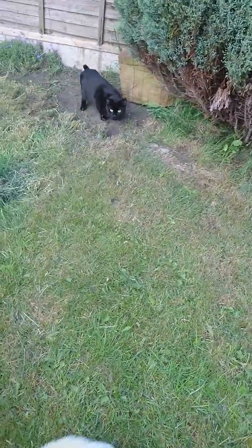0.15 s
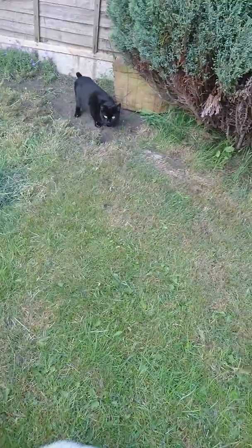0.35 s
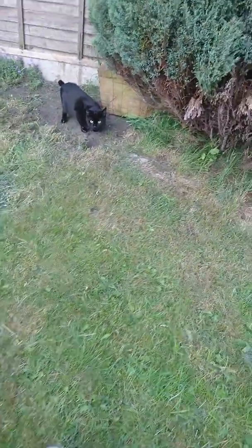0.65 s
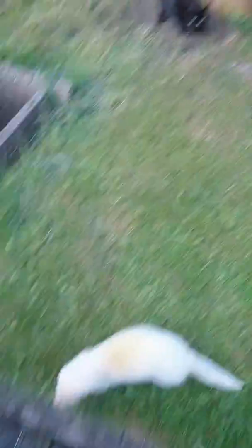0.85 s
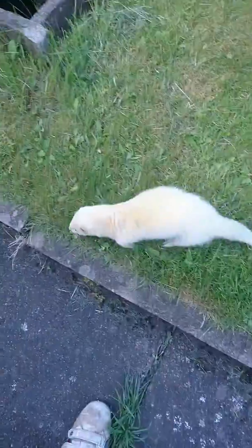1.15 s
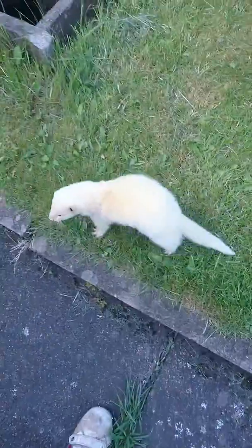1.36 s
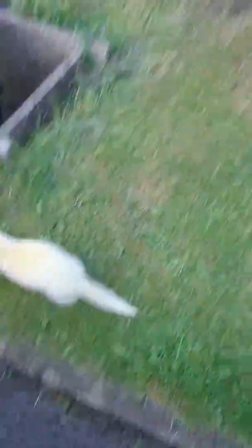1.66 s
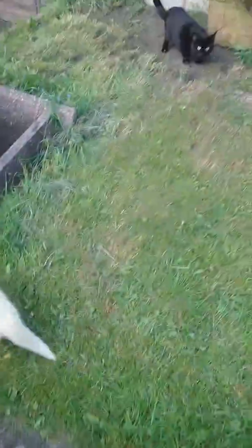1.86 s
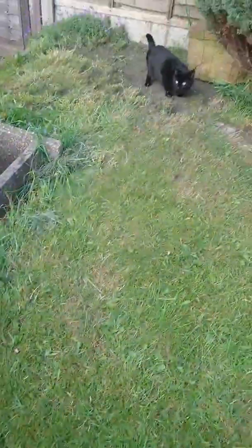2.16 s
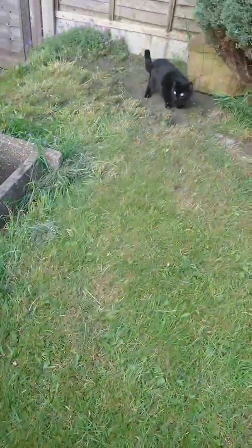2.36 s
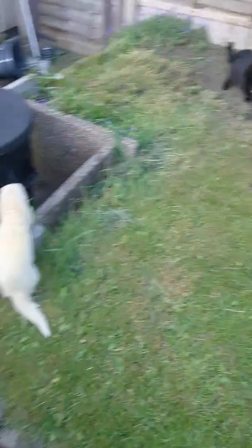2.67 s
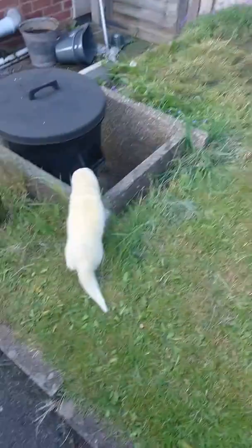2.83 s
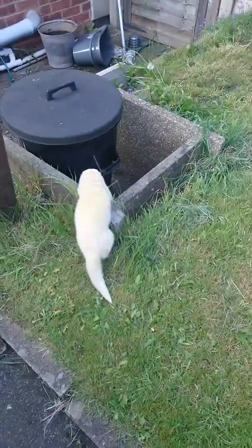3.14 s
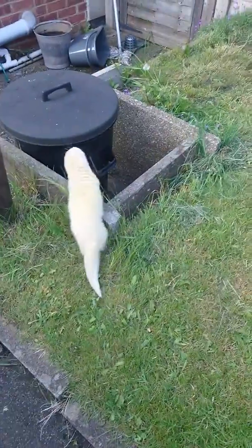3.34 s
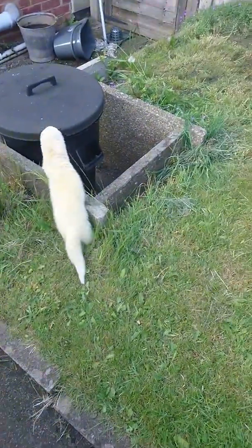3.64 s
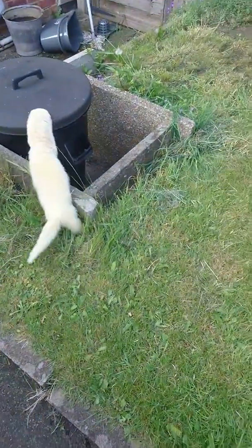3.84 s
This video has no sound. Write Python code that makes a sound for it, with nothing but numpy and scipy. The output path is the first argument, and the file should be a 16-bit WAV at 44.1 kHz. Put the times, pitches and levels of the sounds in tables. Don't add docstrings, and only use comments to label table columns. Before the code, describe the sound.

Ferret gives short soft clucks on a lawn after wind buffets the microphone, with distant bird

```python
import sys
import numpy as np
from scipy import signal
from scipy.fft import rfft, irfft
from scipy.io import wavfile
from scipy.ndimage import uniform_filter1d

SR = 44100
rng = np.random.default_rng(int(sys.argv[2]) if len(sys.argv) > 2 else 0)


def dump(signal):
    limited = np.clip(np.atleast_2d(signal).T, -1, 1)
    pcm = np.round(limited * 32767).astype(np.int16)
    wavfile.write(sys.argv[1], SR, pcm)


def attenuation_scalar(level_db):
    decades = np.asarray(level_db, float) / 20
    return 10 ** decades


N = 176400


def read(points, hz):
    f, value = np.transpose(points)
    return np.interp(np.log(hz + 1), np.log(f + 1), value)


def evened(x):
    return x / np.sqrt(np.mean(x ** 2) + 1e-20)


def add(mix, s, sound):
    part = mix[..., max(round(s * SR), 0):][..., :sound.shape[-1]]
    part += sound[..., :part.shape[-1]]


def drift(count, size):
    once = uniform_filter1d(rng.standard_normal(count), size)
    return evened(uniform_filter1d(once, size))


def bumps(rows, t):
    return sum(attenuation_scalar(db) * np.exp(-((t - s) / w) ** 2) for s, w, db in rows)


def echoes(x, t60, wet_db, first=500):
    t = np.arange(SR // 2) / SR
    sparse = rng.standard_normal((2, len(t))) * (rng.random((2, len(t))) < .3)
    taps = sparse * attenuation_scalar(-60 * t / t60) * (t * SR > first)
    taps /= np.linalg.norm(taps, axis=1, keepdims=True)
    return x + attenuation_scalar(wet_db) * signal.fftconvolve(x, taps, axes=1)[:, :N]


def noise_frames():
    a = rng.standard_normal((N // 256 + 5, 513, 4)).T
    hz = np.fft.rfftfreq(1024, 1 / SR)[:, None]
    t = np.arange(a.shape[2]) * 256 / SR
    return a[0] + 1j * a[1], a[2] + 1j * a[3], hz, t


# frequency in Hz, density in dB per Hz.
HUSH = [(29, -35), (50, -1), (151, -7.5), (394, -10), (913, -9.5), (2170, -22), (4450, -26), (10600, -31.5),
        (15500, -42)]
# time in seconds, level in dB.
HUSH_LEVEL = [(.65, 2.5), (1.0, 0.6), (1.8, 0.25), (2.15, 3), (3.6, -0.7), (3.9, 2.5)]
# frequency in Hz, likeness from 0 to 1.
SAME = [(290, 0.88), (640, 0.072), (1200, 0.095), (2500, 0.043)]
# frequency in Hz, left minus right in dB.
LEAN = [(60, -5), (380, -1.5), (1290, -3.5), (2380, -1), (4400, 5.5), (8000, -1.3)]
# middle in seconds, half width in seconds, level in dB,
# frequency in Hz, half width in octaves.
DRONE = (1.58, 0.61, 6.2, 283, 0.73)
HUSH_DB, PATCH_DB = -61.5, 1.16
TRAFFIC_DB_PER_S = -2
AIR_DB = 12


def hush():
    a, b, hz, t = noise_frames()
    patches = uniform_filter1d(rng.standard_normal(a.shape), 10, 0)
    patches = evened(uniform_filter1d(patches, 14, 1))
    same, lean = np.clip(read(SAME, hz), -1, 1), attenuation_scalar(read(LEAN, hz) / 2)
    z = np.array([a * lean, (same * a + np.sqrt(1 - same ** 2) * b) / lean])
    far = np.clip(1.3 - hz / 3000, 0, 1) * np.interp(t, *np.transpose(HUSH_LEVEL))
    traffic = TRAFFIC_DB_PER_S * (t - 2.5) * (hz < 600)
    air = AIR_DB * (hz > 12800) * np.minimum(np.tanh(4 * (t - .9)), .4)
    z *= attenuation_scalar(read(HUSH, hz) + PATCH_DB * patches + far + traffic + air)
    s, w, db, f, octaves = DRONE
    z[1] *= attenuation_scalar(db * np.exp(-((t - s) / w) ** 4 - (np.log2((hz + 1) / f) / octaves) ** 2))
    return attenuation_scalar(HUSH_DB) * evened(signal.istft(z, nperseg=1024, noverlap=768)[1][:, :N])


# time in seconds, level in dB.
LEFT_WIND = [(0, -33.5), (.3, -34), (.5, -32), (.7, -30.5), (.78, -41), (1.12, -62), (1.17, -53.5),
             (2.05, -46), (2.15, -67), (2.5, -52), (2.7, -65), (4, -69)]
RIGHT_WIND = [(0, -42.5), (.25, -47), (.3, -73), (.55, -55), (.66, -69), (.9, -33.5), (1.02, -36.5),
              (1.06, -66), (1.97, -59), (2.03, -46.5), (2.08, -72.5), (4, -73.5)]
# middle in seconds, level in dB.
GUSTS = [(0.826, -33.5), (1.0, -38), (1.083, -42), (1.229, -39.5), (1.46, -50.5), (1.651, -45),
         (1.707, -44), (1.919, -46.5), (1.97, -52), (2.36, -50.5), (2.519, -55), (2.86, -58), (3.398, -54)]
# middle in seconds, peak in dB,
# push (+1) or pull (-1), half width in ms.
SLAPS = [(0.0352, -34, 1, 0.61), (0.0531, -26.5, -1, 1.1), (0.1048, -27, 1, 0.88), (0.1558, -32, -1, 1.8),
         (0.2185, -24.5, 1, 1.23), (0.2506, -20, -1, 1.36), (0.3022, -23, 1, 1.8), (0.3396, -22, -1, 1.5),
         (0.3735, -21.5, -1, 0.64), (0.3758, -16, 1, 2), (0.398, -21, 1, 1.6), (0.403, -22.5, -1, 1.9),
         (0.4074, -24, 1, 1.7), (0.4368, -22.5, 1, 1.1), (0.4443, -17, -1, 1.3), (0.4771, -15.5, 1, 1.06),
         (0.491, -13, 1, 1.5), (0.54, -27, -1, 4), (0.5681, -21, 1, 1.6), (0.5709, -18.5, -1, 1),
         (0.5842, -18, -1, 0.83), (0.6228, -25.5, -1, 0.65), (0.6442, -20.5, -1, 1.05),
         (0.673, -22, 1, 1.5), (0.683, -26, 1, 1.7), (0.693, -23.5, -1, 1.26), (0.6974, -22.5, 1, 0.81),
         (0.724, -25.5, 1, 0.92), (0.832, -18.5, -1, 1.6), (0.998, -29, 1, 2.5)]
EDDY_HZ = (149.3, 118)
EDDY_HZ_PER_DB, EDDY_SLOPE_DB = 8.5, -35
GUST_S, LUMPY_DB = 0.036, 3.5


def wind():
    a, b, hz, t = noise_frames()
    gusts = bumps([(s, GUST_S, db) for s, db in GUSTS], t)
    left_db = 20 * np.log10(attenuation_scalar(np.interp(t, *np.transpose(LEFT_WIND))) + gusts)
    right_db = np.interp(t, *np.transpose(RIGHT_WIND))
    out = np.zeros((2, N))
    for k, (z, db) in enumerate([(a, left_db), (b, right_db)]):
        corner = np.maximum(EDDY_HZ[k] + EDDY_HZ_PER_DB * (uniform_filter1d(db, 30) + 36), 85)
        shape = attenuation_scalar(EDDY_SLOPE_DB * np.log2(1 + (hz / corner) ** 2) / 2) * (hz / corner) ** .7
        flow = signal.istft(z * shape, nperseg=1024, noverlap=768)[1][:N]
        flow /= np.sqrt(uniform_filter1d(flow ** 2, 3000) + 1e-20)
        strength_db = np.interp(np.arange(N) / 256, np.arange(len(t)), db)
        out[k] = flow * attenuation_scalar(strength_db + LUMPY_DB * drift(count=N, size=500))
    u = np.arange(-400, 400) / SR
    for s, db, sign, ms in SLAPS:
        bell = (1000 * u / ms) ** 2
        pulse = np.exp(-bell) - 0.095 * np.exp(-bell / 6)
        add(out[0], s + u[0], np.sign(sign) * attenuation_scalar(db) * pulse)
    return out


# middle in seconds, half width in seconds, level in dB, brightness in dB per octave.
RUSTLES = [
    (1.13, 0.2, -75, 1),
    (2.218, 0.019, -61.5, -4),
    (2.243, 0.013, -62.5, -0.5),
    (2.43, 0.25, -71, -1),
    (3.03, 0.014, -70, -2),
    (3.33, 0.035, -72.5, 3),
    (3.51, 0.054, -71.5, 3),
    (3.591, 0.012, -64.5, -0.5),
    (3.605, 0.032, -67.5, 5),
    (3.8, 0.027, -69.5, -3.5),
]
# frequency in Hz, level in dB.
GRASS = [(2000, 1.5), (4500, 9), (7000, 5.5), (10000, -3.5), (13500, -4), (15600, -2)]
# middle in seconds, peak in dB, centre frequency in Hz.
TICKS = [
    (2.193, -57, 3200),
    (2.268, -59, 4500),
    (3.029, -59, 2900),
    (3.085, -57, 2900),
    (3.535, -55, 4400),
    (3.592, -55, 6500),
    (3.609, -53, 13200),
    (3.787, -59, 4200),
    (3.825, -49, 3300),
]
CRACKLE_PER_S, CRACKLE_SPREAD_DB, TICK_MS = 1200, 4.2, .24


def grass():
    strength = attenuation_scalar(CRACKLE_SPREAD_DB * np.minimum(rng.exponential(1, N), 4))
    grit = strength * (rng.random(N) < CRACKLE_PER_S / SR)
    x = (1 + uniform_filter1d(grit, 30) * 8) * rng.standard_normal((2, N))
    hz, t = np.fft.rfftfreq(N, 1 / SR), np.arange(N) / SR
    blades = rfft(x) * attenuation_scalar(read(GRASS, hz) - 58 * (hz < 700))
    out = np.zeros((2, N))
    for *row, tilt_db in RUSTLES:
        rub = irfft(blades * attenuation_scalar(tilt_db * np.log2(hz / 5000 + .01)), N)
        out += evened(rub) * bumps([row], t)
    u = np.arange(-100, 100) / SR
    for s, db, f in TICKS:
        envelope = attenuation_scalar(db) * np.exp(-(1000 * u / TICK_MS) ** 2)
        add(out, s + u[0], envelope * np.sin(2 * np.pi * f * u + np.array([[0], [.7]])))
    return out


# time in seconds, pitch in Hz, level in dB.
SONG_A = [
    [(2.53, 4330, -74), (2.56, 4250, -75), (2.63, 4230, -83)],
    [(2.7, 4820, -77), (2.715, 4840, -70), (2.745, 4910, -66), (2.753, 4720, -61), (2.762, 4310, -65),
     (2.766, 3550, -75), (2.775, 3540, -79)],
    [(2.865, 6010, -72), (2.895, 6070, -66.5), (2.925, 6380, -73.5), (2.94, 6510, -70), (2.96, 6100, -70),
     (2.985, 5400, -69)],
    [(3.05, 4800, -66), (3.06, 4830, -71), (3.09, 4900, -69.5), (3.11, 4940, -81), (3.135, 4840, -71)],
    [(3.143, 4540, -67), (3.16, 4580, -65), (3.19, 4840, -72), (3.21, 4600, -84), (3.27, 4440, -85)],
    [(3.3, 4400, -80), (3.325, 4400, -68.5), (3.335, 3950, -67), (3.355, 4140, -70), (3.385, 4140, -70.5),
     (3.43, 4000, -83)],
]
SONG_B = [
    [(3.525, 5050, -68.5), (3.565, 5000, -83), (3.595, 5000, -68), (3.68, 4950, -86)],
    [(3.828, 5400, -69), (3.865, 5300, -58), (3.885, 5250, -60.5), (3.935, 4980, -56.5), (3.98, 4450, -70)],
    [(3.975, 5000, -59), (3.995, 4950, -61.5), (4.02, 4900, -56)],
    [(0.0, 1780, -75), (.12, 1770, -75)],
]
# frequency in Hz, left minus right in dB.
BIRD_PAN = [(2000, -5.5), (5100, 11.5), (6000, -9)]
QUAVER, TRILL = .004, .021
TRILL_FROM_S, TRILL_TO_S = 3, 3.7
WARBLE_DB, BIRD_WET_DB, BIRD_T60_S = 3.5, -3, .3


def bird():
    out = np.zeros((2, N))
    for note in SONG_A + SONG_B:
        s, hz, db = np.transpose(note)
        t = np.arange(s[0], s[-1], 1 / SR)
        f = np.interp(t, s, hz)
        edge = np.clip(np.minimum(t - s[0], s[-1] - t) / 0.00193, 0, 1)
        wobble = TRILL if TRILL_FROM_S < s[0] < TRILL_TO_S else QUAVER
        pan_db = np.outer([.5, -.5], read(BIRD_PAN, f))
        level = np.interp(t, s, db) + WARBLE_DB * drift(count=len(t), size=200) + pan_db
        phase = 2 * np.pi * np.cumsum(f * (1 + wobble * drift(count=len(t), size=70))) / SR
        add(out, s[0], edge * attenuation_scalar(level) * np.sin(phase + np.array([[0], [1.5]])))
    return echoes(out, BIRD_T60_S, BIRD_WET_DB, first=130)


CLUCK_RISE_S, CLUCK_FALL, JITTER = .0045, .38, .012
LOW_PAN_DB, LOW_LEAD = -3, 0.11
OPENING = 6.6
FIFTH_DB, SIXTH_DB = -39, -50
RASP_DB, RASP_SMOOTH = -12, 28
CLOSE_DB, CLOSE_WIDTH = -3, .25


def cluck(length, db, hz, second_db, pan_db, lead, half_db, sag, third_db, fourth_db, seventh_db, eighth_db):
    t = np.arange(0, length + 0.0026, 1 / SR)
    u = t / length
    to_end = u[-1] - u
    jitter = JITTER * (.5 + 2 * u ** 2) * drift(count=len(t), size=60)
    turn = 2 * np.pi * np.cumsum(hz * (1 - sag * u ** 2 + jitter)) / SR
    ramp = np.minimum(t / CLUCK_RISE_S, to_end / (CLUCK_FALL + u[-1] - 1))
    shape = np.sin(np.pi / 2 * np.clip(ramp, 0, 1)) ** 2
    side = np.array([[.5], [-.5]])
    uneven = 1 + 2 * attenuation_scalar(half_db) * np.clip(2 * u, 0, 1) * np.cos(turn / 2)
    uneven = uneven + attenuation_scalar(RASP_DB) * (0.16 + u) * drift(count=len(t), size=RASP_SMOOTH)
    closing = attenuation_scalar(CLOSE_DB + half_db / 2) * np.exp(-((u - 1.05) / CLOSE_WIDTH) ** 2)
    closing = closing * np.sin(turn / 2) * np.clip(to_end * 8, 0, 1)
    second = second_db + OPENING * max(-second_db, 0) * (u ** 2 - .5)
    low = attenuation_scalar(side * LOW_PAN_DB) * np.sin(turn + side * LOW_LEAD)
    overtones = [second, third_db, fourth_db, FIFTH_DB, SIXTH_DB, seventh_db, eighth_db]
    high = sum(attenuation_scalar(d) * np.sin((k + 2) * turn + side * lead + k) for k, d in enumerate(overtones))
    voice = (1 + uneven) / 2 * low + uneven * attenuation_scalar(side * pan_db) * high
    return attenuation_scalar(db) * np.sqrt(2) * (shape * voice + closing)


# start in seconds, length in seconds, level in dB, pitch in Hz, second harmonic in dB.
CLUCKS = [(1.172, 0.019, -54, 567, 3), (1.285, 0.012, -60.5, 553, 4.5), (1.464, 0.016, -66.5, 538, 0),
          (1.545, 0.0238, -53, 616, -8), (1.661, 0.0164, -52, 606, -3.5), (1.814, 0.024, -52.5, 578, -1.5),
          (1.952, 0.028, -51.5, 596, 1), (2.199, 0.014, -57, 578, 1), (2.807, 0.021, -68.5, 521, 6),
          (3.727, 0.017, -54.5, 597, 2.5), (3.884, 0.0138, -50, 675, 3), (3.893, 0.021, -52.5, 575, 1)]
# overtones left minus right in dB, radians the left leads,
# half-pitch lines in dB, pitch sag as a share.
POSES = [(-8, 0.8, -32.5, 0.022), (-8, 1.2, -31, 0.059), (-23.5, 0.2, -29.5, 0.029), (-1, -2, -24, 0.092),
         (-1, 4.5, -8, 0.25), (-1, 1.5, -44, 0.106), (-4, -1.6, -20.5, 0.047), (-5, 4.5, -7, 0.14),
         (1, 1.1, -12, 0.028), (-4, -2, -16, 0.057), (-2, 2, -12, 0.081), (-4, 1.5, -5.5, 0.04)]
# third, fourth, seventh and eighth harmonic, all in dB.
MOUTHS = [(-15.5, -24, -34, -38), (-12, -16, -40, -40), (-9, -22, -42, -40), (-22, -17, -18, -38),
          (-33, -18, -40, -37), (-33, -24, -40, -44), (-18, -25, -43, -26.5), (-4, -30, -35, -31),
          (-18, -22, -40, -40), (-20, -18, -27, -40), (-14, -24, -34, -40), (-17, -21, -25, -36)]
# start in seconds, length in seconds, level in dB, pitch in Hz.
GRUNT = (3.852, .034, -59, 255)
CLUCK_WET_DB, CLUCK_T60_S = -11.5, 0.13


def ferret():
    out = np.zeros((2, N))
    for (s, *call), pose, mouth in zip(CLUCKS, POSES, MOUTHS):
        add(out, s, cluck(*call, *pose, *mouth))
    s, length, db, hz = GRUNT
    t = np.arange(0, length, 1 / SR)
    hum = np.sqrt(np.sin(np.pi * t / length)) * np.sin(2 * np.pi * hz * t)
    add(out, s, attenuation_scalar(db) * hum * np.ones((2, 1)))
    return echoes(out, CLUCK_T60_S, CLUCK_WET_DB)


def scene():
    return hush() + wind() + grass() + bird() + ferret()


def top_cut(x):
    return signal.sosfilt(signal.butter(12, 15660, fs=SR, output="sos"), x)


LOW_CUT_HZ, EDGE_HZ = 53.3, 15780


def record(dry):
    low_cut = signal.butter(7, LOW_CUT_HZ, "high", fs=SR, output="sos")
    treble_cut = signal.firwin(511, EDGE_HZ, window=("kaiser", 9), fs=SR)
    mix = signal.sosfilt(low_cut, dry)
    mix = signal.oaconvolve(mix, treble_cut[None], "same")
    return top_cut(mix)


dry = scene()
out = record(dry)
dump(out)
```